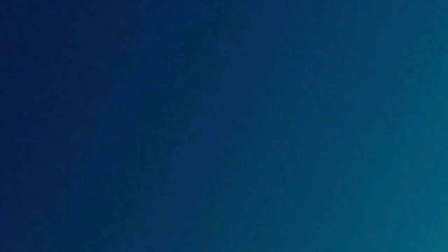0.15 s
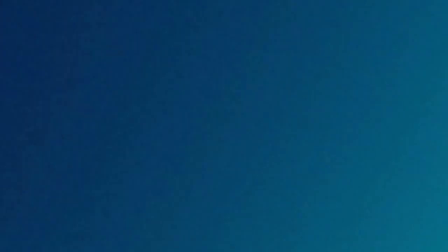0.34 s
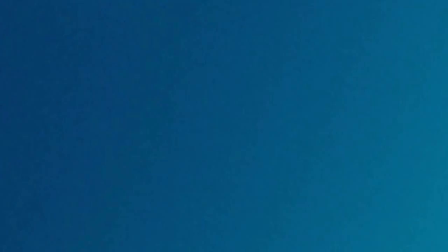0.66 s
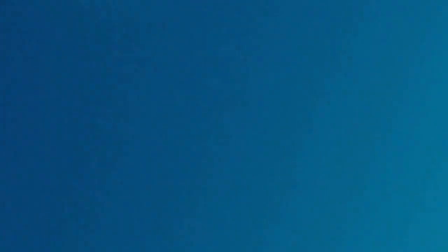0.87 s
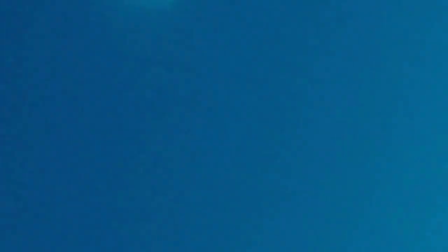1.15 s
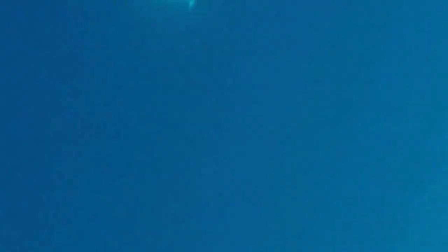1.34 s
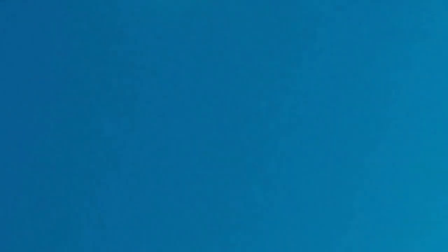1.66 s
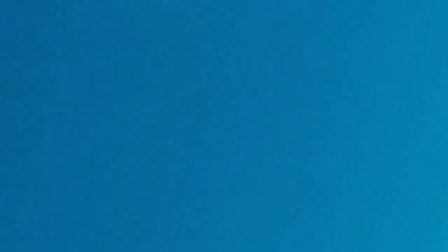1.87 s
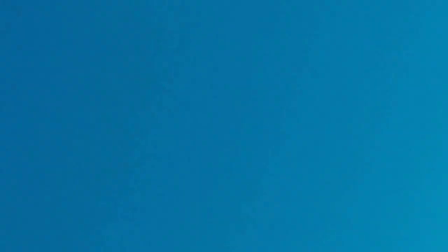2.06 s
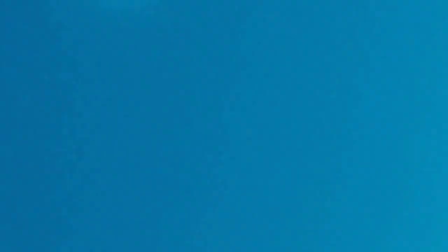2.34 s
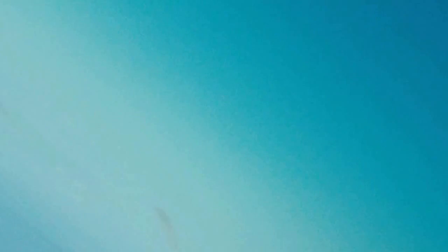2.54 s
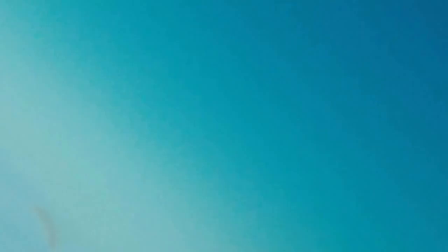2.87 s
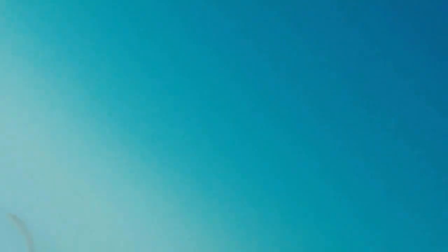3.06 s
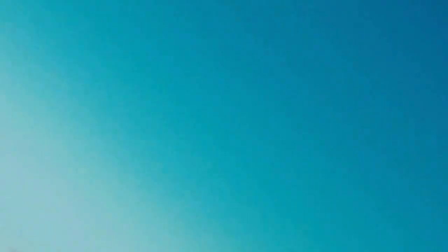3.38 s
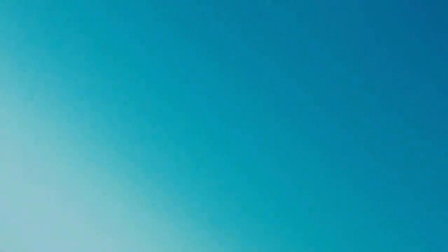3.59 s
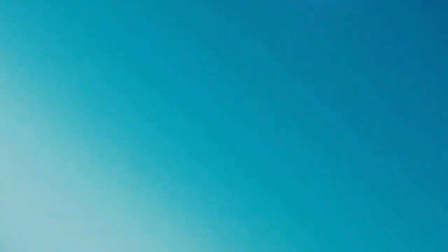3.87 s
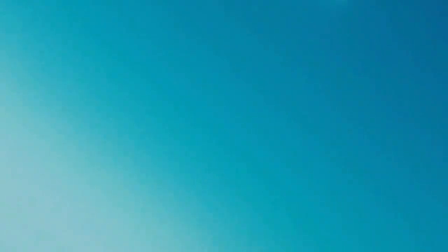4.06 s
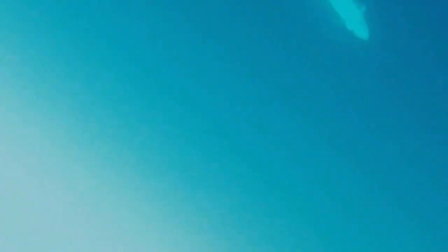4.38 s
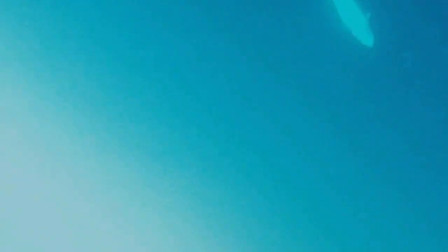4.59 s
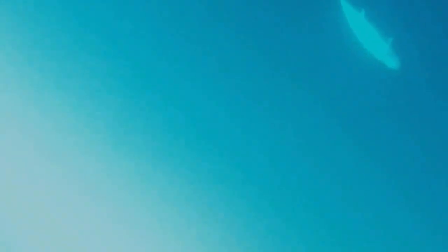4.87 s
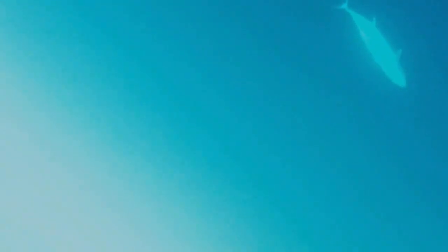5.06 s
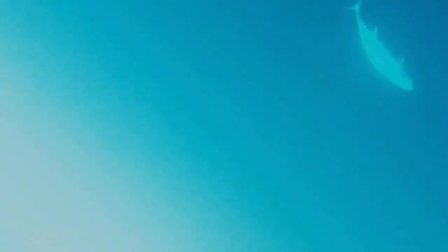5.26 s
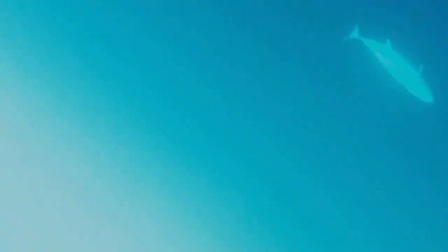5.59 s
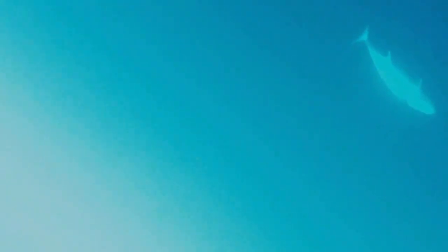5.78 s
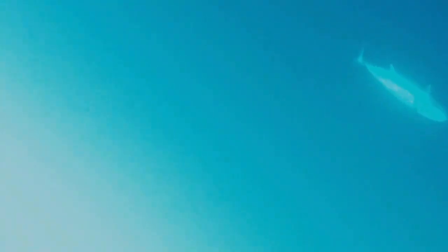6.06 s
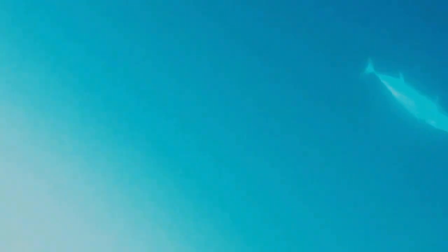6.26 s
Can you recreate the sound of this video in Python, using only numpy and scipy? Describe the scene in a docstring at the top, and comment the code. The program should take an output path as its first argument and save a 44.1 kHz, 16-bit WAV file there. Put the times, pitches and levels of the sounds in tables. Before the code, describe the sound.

Close underwater sound inside a housing: heavy, overloaded low throbbing of water, with trapped air crackling, plopping and frothing at the start. A few bubbles follow, a low gulp near one second, then a second bright cluster of pops past two seconds. Afterwards the rumble gradually weakens over a thin constant hiss, with sparse clicks and soft knocks. The sound sits almost entirely on the left, the right faint and bassy.

```python
"""A camera in a sealed housing is pushed under the sea, and flow along the housing rumbles throughout.
At first trapped air breaks off: single bubbles, and a few long rings of the housing near 1900 Hz, are
decaying sines with a noise crack, over a fine froth. A few low knocks and gulps (damped low modes)
sound, most of them after the bubbles; as the flow eases, sharp ticks ring the shell. Small eddies gurgle
and shaped noise hisses all along. The left microphone is far more sensitive than the right one and
overloads, so the rumble chops all else."""
import sys
import numpy as np
from scipy import signal
from scipy.fft import rfft, irfft, next_fast_len
from scipy.io import wavfile
from scipy.ndimage import uniform_filter1d, map_coordinates

SR = 44100
rng = np.random.default_rng(int(sys.argv[2]) if len(sys.argv) > 2 else 0)


def log_audio(samples):
    """Write samples as a 16-bit WAV file to the path given in sys.argv[1]."""
    # one column per channel
    frames = np.atleast_2d(samples).T
    # limit to full scale, then quantise
    limited = np.clip(frames, -1, 1)
    pcm = np.round(limited * 32767).astype(np.int16)
    wavfile.write(sys.argv[1], SR, pcm)


N = 283640  # length in samples

# Strength of the flow along the housing, easing as the camera settles: start_s [s], level_db [dB]
FLOW_STRENGTH = [(0, -0.5), (.3, 5.5), (.56, -2), (.75, 5), (.9, -1.5), (1.2, 5), (1.33, -0.5), (1.55, 1.5),
                 (1.85, -4), (2.85, 0), (3.1, -4.5), (3.6, -2), (3.87, -8), (4.08, -1.5), (4.3, -7),
                 (5.15, -9.5), (5.9, -9), (6.43, -9)]
SURGE_DB, SURGE_RATE = 1.5, 11  # chance swells: depth [dB], random knots per second


def flow_level():
    """Turbulent fluctuation: the mean flow strength in dB, with chance swells about it."""
    return curve(FLOW_STRENGTH) + SURGE_DB * wander(SURGE_RATE)


# Rate at which eddies leave the housing: start_s [s], rate_hz [Hz]
SHEDDING_RATE = [(0, 62.05), (.22, 53.17), (1.08, 51.99), (1.18, 64.43), (1.3, 51.21), (1.9, 58),
                 (2.42, 52.81), (2.64, 62.85), (3.05, 49.93), (3.65, 52.09), (4.2, 56.84), (6.1, 49.92),
                 (6.3, 63)]
# Relative spectrum of the formless drift: frequency_hz [Hz], level_db [dB per Hz]
DRIFT_SPECTRUM = [(10, -20), (22, 5), (35, -8), (60, -1), (75, -0.5), (95, -11.5), (130, -29), (250, -90),
                  (500, -100)]
DRIFT_SHARE, DRIFT_SHARE_PER_DB = 0.24, 0.06  # power share at 0 dB flow, and its growth per dB of easing


def rumble(flow_db, jitter, uneven_db):
    """Vortex shedding: eddies leave at a wavering rate; easing flow breaks them into formless drift."""
    rate_hz = curve(SHEDDING_RATE) * np.exp(jitter * wander(45))
    phase = 2 * np.pi * np.cumsum(rate_hz) / SR
    shedding = unit(np.sin(phase) * amp(uneven_db * wander(35)))
    share = np.clip(DRIFT_SHARE - DRIFT_SHARE_PER_DB * flow_db, .05, .95)
    drift = eddy_train(DRIFT_SPECTRUM, evenness=0.51, memory_s=0.055)
    # square roots, because independent sounds add in power
    sway = np.sqrt(1 - share) * shedding + np.sqrt(share) * drift
    return amp(flow_db) * sway


def eddy_train(spectrum, evenness, memory_s):
    """Turbulent pressure of rms 1: partial envelope levelling gives successive eddies similar strength."""
    x = noise(spectrum)
    power = np.abs(signal.hilbert(x)) ** 2
    strength = np.abs(uniform_filter1d(power, int(memory_s * SR))) + .02
    return unit(x / strength ** (np.clip(evenness, 0, 1) / 2))


def own_flow(flow_db):
    """Local turbulence: flow noise at the right microphone, unrelated to the shared rumble."""
    return amp(flow_db - 12) * noise(DRIFT_SPECTRUM)


# Single bubbles, and a few long rings of the housing near 1900 Hz: start_s [s], pitch_hz [Hz],
# level_db [dB, nominal peak of the ring], t60_s [s], crack_db [dB re level_db]
BUBBLES_AND_RINGS = [ (0.0386, 2466, 32.5, 0.016, -12.5), (0.05, 1310, 15.5, 0.054, -14),
                     (.085, 2310, 21.5, 0.013, 4), (0.113, 2510, 15, 0.0098, -7),
                     (.1268, 1990, 18.5, 0.02, 4.5), (.133, 940, 8, 0.036, 1),
                     (.208, 1110, 13.5, 0.011, -16), (0.2432, 1510, 7.5, 0.014, 1.5),
                     (0.28, 834, 17.5, 0.02, 3), (0.2878, 2740, 47, 0.0072, -19),
                     (0.321, 3180, 3.5, .023, 5.5), (0.327, 1530, 6, .034, -10),
                     (.345, 3980, 14.5, .03, -2), (.350, 535, 20.5, 0.032, -10),
                     (.358, 1938, 19.5, 0.048, 1), (.367, 2023, 18, .03, 1), (.402, 554, 19, 0.13, -19),
                     (0.43, 1810, 5, 0.019, -17), (.445, 660, 18.5, 0.039, -29),
                     (0.465, 968, 7, 0.061, -22), (.505, 5040, 3.5, 0.0094, 6), (.53, 1860, 22, .024, -8),
                     (.533, 1054, 4, 0.067, -25), (0.571, 5030, 0, .006, 0),
                     (0.5939, 487, 16.5, 0.072, -18), (0.645, 1905, 3.5, 0.065, -7),
                     (.685, 1830, 2.5, 0.085, -8.5), (.701, 562, 18, 0.017, -22),
                     (0.839, 630, 18, 0.052, -12), (.8932, 1990, 8.5, 0.04, -20),
                     (0.893, 754, 5, 0.058, -26), (0.984, 1540, -1.5, 0.038, -22),
                     (1.014, 540, 2, 0.021, -19), (1.167, 1610, 1, 0.017, -15),
                     (1.1735, 1072, 9.5, 0.014, -26), (1.5, 830, -10.5, .033, -6),
                     (1.559, 5400, -9, 0.023, 2), (1.764, 1682, 9, .025, 4.5), (1.878, 2260, 1, .017, -2),
                     (1.926, 2310, 7, 0.0099, -1.5), (1.931, 3120, 6.5, 0.011, -20),
                     (1.943, 2720, -8, 0.032, -1), (2.016, 1755, -3.5, 0.069, -11),
                     (2.039, 900, -3.5, 0.063, -9), (2.07, 1243, 7.5, 0.0083, -24),
                     (2.082, 1870, -0.5, 0.042, 2), (2.097, 2200, 16.5, 0.013, -4.5),
                     (2.109, 860, 6, 0.018, -13), (2.11, 1077, 9, 0.027, -14), (2.114, 1738, 5, 0.051, -4),
                     (2.182, 2230, 11, 0.014, 1), (2.207, 3300, -4.5, 0.027, -5),
                     (2.22, 3400, -3.5, 0.022, 5.5), (2.243, 1970, 16.5, 0.01, -5.5),
                     (2.253, 1830, 7.5, .014, -0.5), (2.277, 1933, 35.5, 0.019, -17),
                     (2.29, 1670, 8, 0.018, 1), (2.3153, 2140, 24, 0.015, -10),
                     (2.323, 2475, 24, 0.024, -2), (2.342, 1950, -4, 0.025, -2)]
# Mean pitch glide against starting pitch: pitch_hz [Hz], climb [octaves per s]
# Most climb as bubbles near the surface; the highest-pitched tend to fall
PITCH_CLIMB = [(480, 5), (650, 14.5), (1200, 5), (2200, -1.5)]
CLIMB_SCATTER = 1.52  # spread from one sound to the next [octaves per s]


def bubbles_and_rings(attack_s, crack_t60_s, wobble, wobble_rate):
    """Damped resonance: each sound cracks (a bubble's pinch-off) and rings; its pitch glides and wavers."""
    out, t = np.zeros(N), np.arange(SR // 6) / SR
    for start_s, pitch_hz, level_db, t60_s, crack_db in BUBBLES_AND_RINGS:
        climb = along(PITCH_CLIMB, pitch_hz) + CLIMB_SCATTER * rng.standard_normal()
        # the waver of a lopsided bubble dies out as it rings
        shape = map_coordinates(rng.standard_normal(400), [t * wobble_rate])
        waver = 1 + wobble * shape * np.exp(-t / t60_s)
        gliding_hz = pitch_hz * 2 ** (climb * t) * waver
        tone = np.sin(2 * np.pi * np.cumsum(gliding_hz) / SR)
        ring = tone * fade(t, t60_s) * (1 - np.exp(-t / attack_s))
        soft_noise = signal.lfilter([.5], [1, -.6], rng.standard_normal(len(t)))
        crack = soft_noise * fade(t, crack_t60_s)
        add(out, start_s, amp(level_db) * (ring + amp(crack_db) * crack))
    return out


# Relative spectrum of the fizz: frequency_hz [Hz], level_db [dB per Hz]
FIZZ_SPECTRUM = [(200, -29), (600, -3), (1200, -6), (2400, 3.5), (4000, -11.5), (8000, -20), (15000, -33)]
# Clouds of fine bubbles torn off the housing: start_s [s], length_s [s], level_db [dB]
BUBBLE_CLOUDS = [(0.021, 0.13, -7), (0.258, 0.035, -11.5), (0.332, 0.13, -8.5), (0.61, 0.049, -31),
                 (2.053, 0.044, -16), (2.176, 0.075, -25.5)]
CLOUD_ATTACK_S, CLOUD_T60_S = 0.029, 0.24  # a cloud builds up and clears [s]
AIR_GONE_S, CLINGING_DB = 2.4, -39  # faint froth holds until this time [s], at this level [dB]


def froth(grain_db, grain_rate):
    """Superposed small resonators: fine bubbles ring and snap, and the finest merge into a fizz."""
    level = amp(CLINGING_DB) * cloud(0, AIR_GONE_S)
    for start_s, length_s, level_db in BUBBLE_CLOUDS:
        level = level + amp(level_db) * cloud(start_s, length_s)
    rings = swarm(AIR_GONE_S, count=1500, centre_hz=1720, spread=0.613, cycles=9.1, size_db=5.5)
    snaps = swarm(AIR_GONE_S, count=500, centre_hz=2900, spread=0.51, cycles=2.7, size_db=6.5)
    fizz = unit(amp(grain_db * wander(grain_rate)) * noise(FIZZ_SPECTRUM))
    return level * (amp(-5.0) * rings + amp(-9.5) * snaps + amp(-6.5) * fizz)


def cloud(start_s, length_s):
    """Envelope of a bubble cloud: linear growth, a hold, then exponential clearing."""
    t = np.arange(N) / SR - start_s
    return np.clip(t / CLOUD_ATTACK_S, 0, 1) * fade(np.maximum(t - length_s, 0), CLOUD_T60_S)


def swarm(end_s, count, centre_hz, spread, cycles, size_db):
    """Random superposition: bubbles of random size start before end_s and ring for some cycles; rms 1."""
    t = np.arange(int(min(4 * cycles / centre_hz, .1) * SR)) / SR
    start_s = rng.uniform(0, end_s, (count, 1))
    hz = centre_hz * np.exp(spread * np.clip(rng.standard_normal((count, 1)), -2.5, 2.5))
    size = amp(size_db * np.minimum(rng.exponential(size=(count, 1)), 3))
    rings = size * np.sin(2 * np.pi * hz * t) * fade(t, cycles / hz) * (1 - np.exp(-2 * hz * t))
    position = ((start_s + t) * SR).astype(int)
    return unit(np.bincount(position.ravel(), rings.ravel(), N)[:N])


def housing(x, ring_hz, width_hz, ring_db):
    """Cavity resonance: the air inside the housing rings on after each bubble."""
    def response(f):
        damping = 1j * f * width_hz
        return 1 + amp(ring_db) * damping / (ring_hz ** 2 - f * f + damping)
    return filtered(x, response)


# Relative spectrum of the burble: frequency_hz [Hz], level_db [dB per Hz]
BURBLE_SPECTRUM = [(55, -14), (90, 1), (130, 3), (170, -4), (240, -12.5), (300, -9), (420, -21.5),
                   (600, -17), (1000, -29.5), (2500, -88)]
# Swirls of water that gurgle past: peak_s [s], level_db [dB at the peak]
PASSING_SWIRLS = [(.27, -3), (.76, -8.5), (1.02, -17.5), (1.55, -19), (2.05, -19), (2.4, -19.5),
                  (2.8, -16.5), (2.99, -36), (3.3, -16), (3.68, -17.5), (6.07, -23.5)]
SWIRL_S = 0.029  # time constant of both swell and decay [s]
GURGLE_DB, GURGLE_GROWTH = -24, 0.85  # level at 0 dB flow [dB], and its dB per dB of flow


def gurgle(flow_db, lump_db, lump_rate, blub_db):
    """Small-scale turbulence: short lumps and low blubs, stronger in strong flow and in each swirl."""
    t = np.arange(N) / SR
    level = amp(GURGLE_DB + GURGLE_GROWTH * flow_db)
    for peak_s, level_db in PASSING_SWIRLS:
        level = level + amp(level_db) * np.exp(-np.abs(t - peak_s) / SWIRL_S)
    burble = unit(amp(lump_db * wander(lump_rate)) * noise(BURBLE_SPECTRUM))
    blubs = swarm(N / SR, count=200, centre_hz=181.0, spread=0.413, cycles=11.3, size_db=2.5)
    return level * (burble + amp(blub_db) * blubs)


# Sharp ticks on the housing: start_s [s], level_db [dB], tilt_db [dB per octave]
SHARP_TICKS = [(3.148, -11.5, -3.5), (3.198, -3.5, -1.5), (3.471, -12.5, -7), (4.26, -15, -6),
               (4.35, -19, 2), (4.456, -10.5, -3), (5.7566, -21, 4), (5.9037, -11, 0.5), (6.255, -6, -3),
               (6.4155, -22.5, -3)]
# Modes of the housing shell: pitch_hz [Hz], level_db [dB re the tick], t60_s [s]
SHELL_MODES = [(2040, -7.5, 0.0071), (2585, -5.5, 0.01), (3884, 2, 0.009), (6250, -1.5, 0.0039),
               (8300, 0.5, 0.0029)]


def ticks():
    """Modal excitation: each sharp tick sets the high, short modes of the shell ringing."""
    return modal_hits(SHARP_TICKS, SHELL_MODES, crack_db=-9, crack_t60_s=0.0087)


# Low knocks and short gurgles: start_s [s], level_db [dB], tilt_db [dB per octave]
KNOCKS_AND_GULPS = [(1.170, 5.5, -2.5), (1.21, -8, -9), (2.76, -14, 1), (2.98, -17, -3), (3.35, -17, -2),
                    (3.66, -13.5, 5), (4.04, -14.5, -12), (4.54, -14.5, 2), (6.277, 0, -1.5),
                    (6.285, -6, -6.5)]
# Low modes that they ring: pitch_hz [Hz], level_db [dB re the sound], t60_s [s]
LOW_MODES = [(138.5, -11.5, 0.072), (223, -7, 0.09), (301, -14, 0.17), (347, -11.5, 0.081),
             (485, -6, 0.079), (595, -9.5, 0.12), (916, -11.5, 0.011)]


def knocks_and_gulps():
    """Modal excitation: dull thuds and watery gulps that ring low."""
    return modal_hits(KNOCKS_AND_GULPS, LOW_MODES, crack_db=-33, crack_t60_s=.008)


def modal_hits(events, modes, crack_db, crack_t60_s):
    """Modal synthesis: every event rings the modes anew; a higher tilt favours the high ones."""
    out, t = np.zeros(N), np.arange(SR // 4) / SR
    middle_hz = np.median([mode[0] for mode in modes])
    for start_s, level_db, tilt_db in events:
        sound = amp(crack_db) * fade(t, crack_t60_s) * rng.standard_normal(len(t))
        for k, (pitch_hz, mode_db, t60_s) in enumerate(modes):
            tilt = tilt_db * np.log2(pitch_hz / middle_hz)
            strength = amp(mode_db + tilt + rng.standard_normal())  # 1 dB scatter per event
            ring = fade(t, t60_s) * np.sin(2 * np.pi * pitch_hz * t)
            sound = sound + (-1) ** k * strength * ring  # neighbouring modes alternate in sign
        add(out, start_s, amp(level_db) * sound)
    return out


# Relative spectrum of the hiss: frequency_hz [Hz], level_db [dB per Hz]
HISS_SPECTRUM = [(240, -35), (400, -10), (511, -0.5), (586, -4.5), (623, -9), (715, -14), (886, -14),
                 (1000, -11), (1340, -18), (2060, -12), (3360, -20.5), (3790, -13.5), (5820, -24.5),
                 (8400, -22), (15500, -42.5)]


def steady_hiss(level_db):
    """Stationary random noise: a constant level with a fixed spectrum."""
    return amp(level_db) * noise(HISS_SPECTRUM)


# Level of the right microphone against the left: frequency_hz [Hz], level_db [dB]
RIGHT_RESPONSE = [(100, -27), (500, -28), (2000, -26.5), (4000, -25.5), (12000, -25)]


def right_port(x, bass_db, corner_hz):
    """Low-pass phase lag: the right side hears little, save slow pressure swings that reach it late."""
    def response(hz):
        slow_swings = amp(bass_db) / (1 + 1j * hz / corner_hz) ** 2
        return amp(along(RIGHT_RESPONSE, hz)) + slow_swings
    return filtered(x, response)


def amp(db):
    """Logarithmic level: decibels to amplitude gain."""
    return 10 ** (np.asarray(db) / 20)


def unit(x):
    """Normalisation: scale to rms 1."""
    return x / np.sqrt(np.mean(x ** 2) + 1e-20)


def along(points, hz):
    """Logarithmic frequency scale: interpolate (Hz, value) points on it."""
    f, v = np.transpose(points)
    return np.interp(np.log(hz + 1), np.log(f), v)


def curve(rows):
    """Linear interpolation: read (s, value) rows at every sample."""
    return np.interp(np.arange(N) / SR, *np.transpose(rows))


def filtered(x, response):
    """Linear filtering: multiply the spectrum by a frequency response."""
    m = next_fast_len(N + SR // 2)  # zero padding leaves room for the tails
    return irfft(rfft(x, m) * response(np.fft.rfftfreq(m, 1 / SR)), m)[..., :N]


def noise(spectrum):
    """Spectral shaping: white noise coloured by a spectrum, rms 1."""
    return unit(filtered(rng.standard_normal(N), lambda hz: amp(along(spectrum, hz))))


def fade(t, t60_s):
    """Exponential decay: 60 dB down after t60_s."""
    return np.exp(-np.log(1000) * t / t60_s)


def add(track, start_s, sound):
    """Superposition: mix a sound into a track at start_s."""
    start = max(int(start_s * SR), 0)
    track[start:start + len(sound)] += sound[:max(N - start, 0)]


def wander(rate):
    """Band-limited chance: a smooth random curve with rate knots a second."""
    knots = rng.standard_normal(int(N * rate / SR) + 4)
    return map_coordinates(knots, [np.arange(N) * rate / SR])


def scene():
    """Superposition: both sides hear one housing, the right faintly with some flow and hiss of its own."""
    flow_db = flow_level()
    air = bubbles_and_rings(attack_s=0.00013, crack_t60_s=0.017, wobble=0.081, wobble_rate=448)
    air = air + froth(grain_db=3.5, grain_rate=240)
    air = housing(air, ring_hz=1953, width_hz=150, ring_db=-4.5)
    hits = ticks() + knocks_and_gulps()
    water = rumble(flow_db, jitter=0.17, uneven_db=3.0)
    water = water + gurgle(flow_db, lump_db=3.5, lump_rate=22, blub_db=-2.5)
    shared = air + hits + water
    hiss = steady_hiss(-32.5)
    left = shared + hiss
    right = shared + own_flow(flow_db) + hiss / 2 + steady_hiss(-30.0)
    return np.array([left, right_port(right, bass_db=-12, corner_hz=38.8)])


def overload(x, top, hardness):
    """Saturation: the input stage rounds off everything near full scale."""
    return x / (1 + np.abs(x / top) ** hardness) ** (1 / hardness)


# Treble response of the camera: frequency_hz [Hz], level_db [dB]
CAMERA_RESPONSE = [(5000, 1), (9000, -3.5), (15000, -7)]
TOP_HZ = 15750  # band limit, where the gain has halved [Hz]


def record(dry):
    """Saturation, then band limiting: the camera overloads, dulls the treble and cuts the top."""
    clipped = overload(dry, top=1, hardness=6.45)

    def response(hz):
        band_limit = 1 / (1 + (hz / TOP_HZ) ** 90)
        return amp(along(CAMERA_RESPONSE, hz)) * band_limit
    return filtered(clipped, response)


dry = scene()
out = record(dry)
log_audio(out)
```